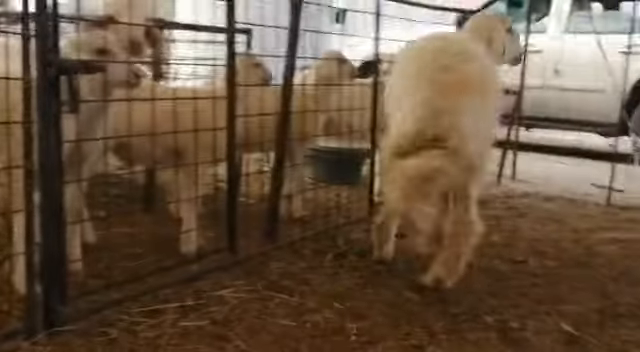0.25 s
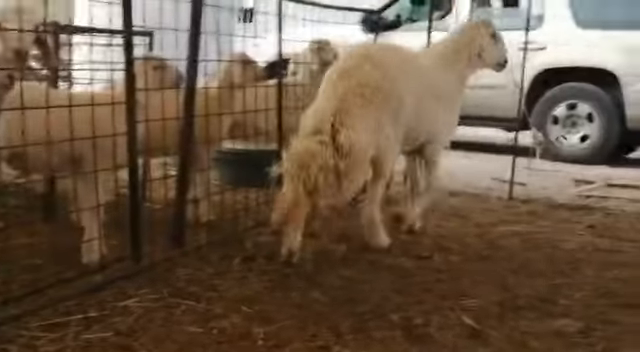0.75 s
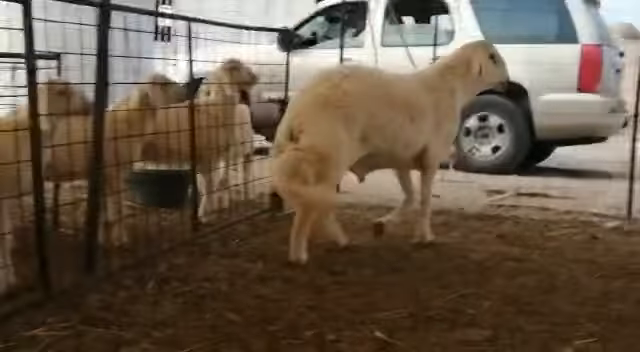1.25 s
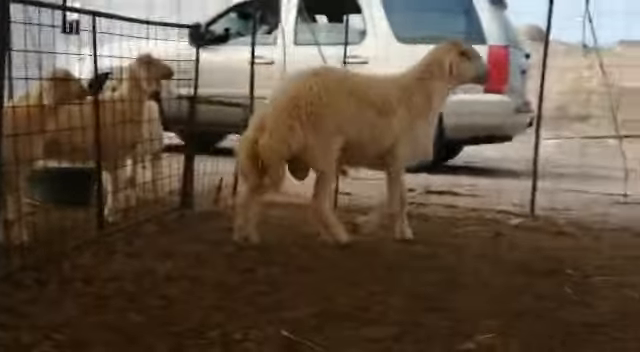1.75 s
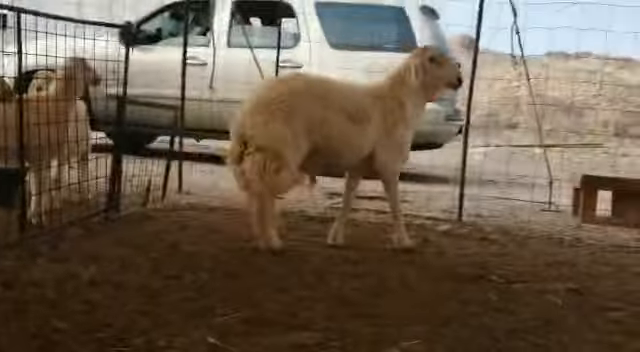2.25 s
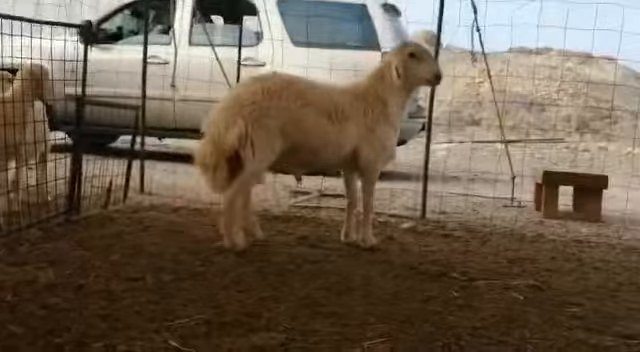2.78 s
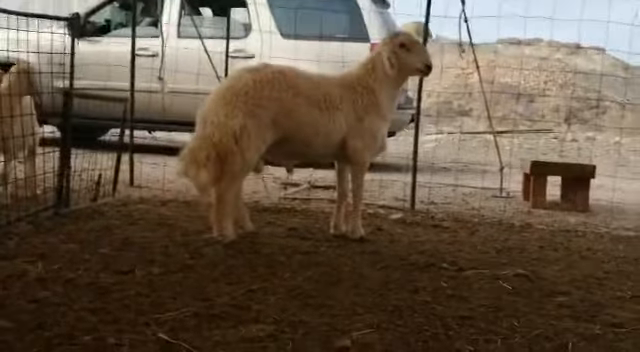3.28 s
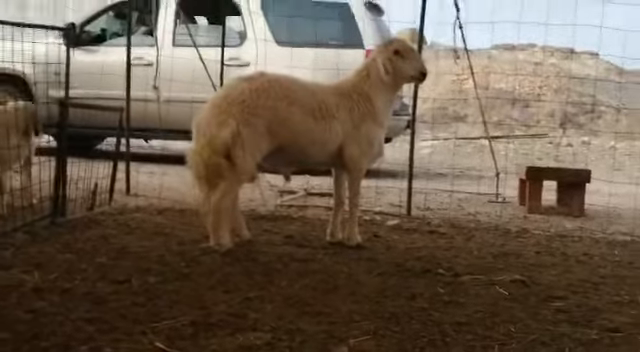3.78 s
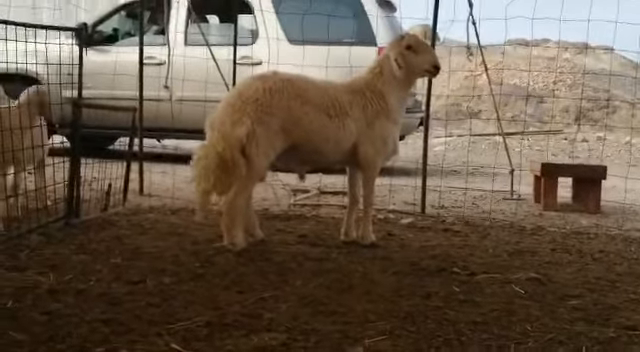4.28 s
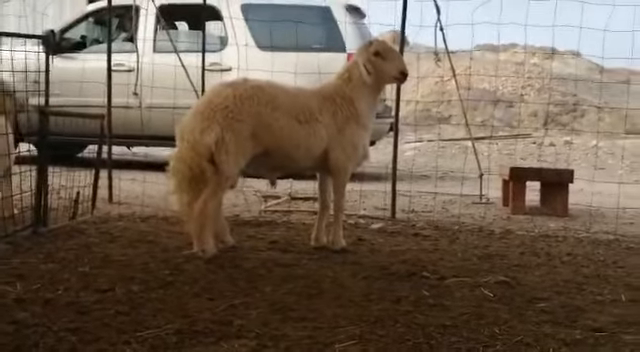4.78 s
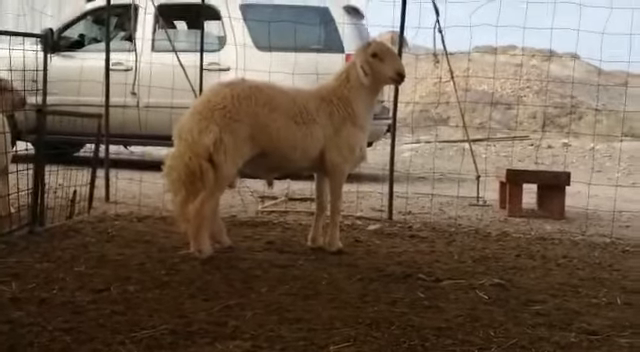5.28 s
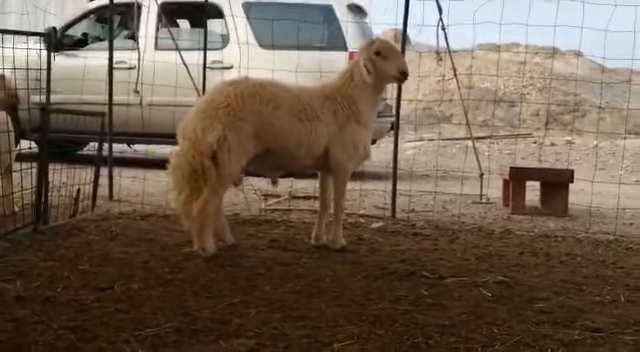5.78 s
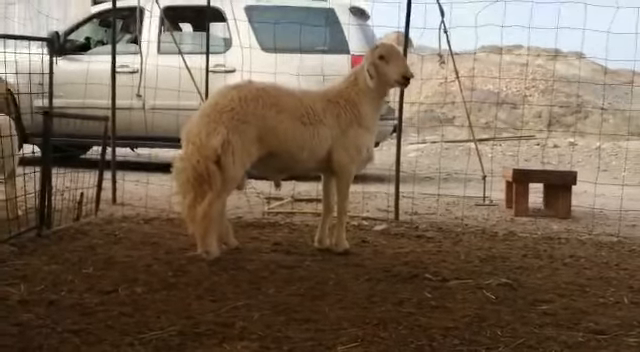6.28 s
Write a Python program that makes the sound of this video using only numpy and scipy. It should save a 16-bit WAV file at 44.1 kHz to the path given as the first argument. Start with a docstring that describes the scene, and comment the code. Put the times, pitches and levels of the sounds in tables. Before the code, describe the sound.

Heavy low wind buffets a hand-held microphone in an open dirt pen while a sheep gives two low, hoarse, quavering bleats amid straw rustles.

```python
"""In an open dirt pen, two low, quavering sheep bleats are heard through a hand-held camera's two ports.
Throat resonances ring at each snap of the vocal folds; the second bleat starts with a creak.
Wind is filtered noise that swells in gusts, with single buffets on the two microphone ports.
A treble hiss rises and falls, straw is scuffed as grainy noise, and a bird chirps in gliding sine tones.
Scrapes and one clack ring resonances, the camera housing ticks in the hand, and faint echoes answer."""
import sys
import numpy as np
from scipy import signal
from scipy.fft import rfft, irfft, next_fast_len
from scipy.io import wavfile

SR = 44100
rng = np.random.default_rng(int(sys.argv[2]) if len(sys.argv) > 2 else 0)


def digitize_waveform(pressure):
    """Quantize a signal to 16-bit integers and store it at the path in sys.argv[1].

    Rows of a 2-D input are taken as channels; values are limited to [-1, 1].
    """
    field = np.atleast_2d(pressure).T
    bounded = np.clip(field, -1, 1)
    quanta = np.round(bounded * 32767).astype(np.int16)
    wavfile.write(sys.argv[1], SR, quanta)


N = 287973
T = np.arange(N) / SR  # time of every sample, s


def gain_of(db):
    """Turns decibels into an amplitude factor."""
    return 10 ** (np.asarray(db) / 20)


def evened(x):
    """Scales a sound to an overall rms of 1."""
    return x / np.sqrt(np.mean(x ** 2) + 1e-20)


def read(points, hz):
    """Reads a spectrum whose points are joined by straight lines on a log-frequency axis."""
    point_hz, value = np.transpose(points)
    return np.interp(np.log(hz + 1), np.log(point_hz), value)


def follow(rows, t):
    """Reads each column of a curve at the times t."""
    s, *columns = np.transpose(rows)
    return [np.interp(t, s, column) for column in columns]


def shaped(x, curve):
    """Filters x by a function from Hz to dB."""
    length = x.shape[-1]
    size = next_fast_len(length)
    gain = gain_of(curve(np.fft.rfftfreq(size, 1 / SR)))
    return irfft(rfft(x, size) * gain, size)[..., :length]


def wander(size, hz):
    """Slow random drift of rms 1, with changes up to about hz."""
    return evened(shaped(rng.standard_normal(size), lambda f: -20 * np.log10(1 + (f / hz) ** 4)))


def panned(x, pan_db):
    """Shares a sound between left and right at constant power; positive leans left."""
    return x * evened(gain_of([[pan_db / 2], [-pan_db / 2]]))


def add(mix, s, sound):
    """Lays a sound into the mix at time s and trims what runs past the end."""
    part = mix[:, max(round(s * SR), 0):][:, :sound.shape[-1]]
    part += sound[..., :part.shape[1]]


def resonate(x, hz, width_hz):
    """A resonance of gain 1 at its centre, which follows the curve hz."""
    turn = np.exp(2j * np.pi * np.cumsum(hz * np.ones(len(x))) / SR)
    r = np.exp(-np.pi * width_hz / SR)
    # shift the centre down to 0 Hz, smooth there, then shift back
    return 2 * (turn * signal.lfilter([1 - r], [1, -r], x / turn + 1e-18)).real


def steadied(x, seconds):
    """Holds the short-term level of x at 1."""
    window = np.hanning(int(seconds * SR) + 3)
    weight = signal.fftconvolve(np.ones(len(x)), window, "same")
    power = signal.fftconvolve(x ** 2, window, "same") / weight
    return x / np.sqrt(abs(power) + 1e-9)


def swell(s, db, length, rise):
    """The power of one smooth rise and fall that peaks at s; rise is the share spent building up."""
    u = (T - s) / length
    side = np.where(u < 0, rise, 1 - rise)
    return gain_of(db) ** 2 * np.exp(-np.minimum((u / side) ** 2, 50))


# colour of the open air: [pitch_hz, level_db per Hz, relative]
AIR_COLOUR = [(20, 19), (70, 14.5), (140, 4.5), (250, 10), (450, 2), (900, 1), (1600, -5), (2500, -12),
              (4000, -25), (9000, -17.5)]


def open_air(level_db=-62.5):
    """Steady noise, strongest in the bass, for the open-air background."""
    return gain_of(level_db) * evened(shaped(rng.standard_normal((2, N)), lambda f: read(AIR_COLOUR, f)))


# colour of the slow heavy eddies: [pitch_hz, level_db per Hz, relative]
RUMBLE_COLOUR = [(8, -10), (25, -2), (60, 1), (100, -3), (160, -12), (240, -33), (350, -61), (600, -100),
                 (1200, -73.5)]
# colour of the small quick eddies: [pitch_hz, level_db per Hz, relative]
FLUTTER_COLOUR = [(50, -37), (130, 9), (210, 8), (320, -4), (470, -18.5), (700, -35), (1100, -57),
                  (3000, -91)]
# the breeze between gusts, before the trim and unrest: [time_s, left_level_db, right_level_db]
BREEZE_LEVELS = [(-0.0, -21, -27.5), (0.53, -33, -34), (0.89, -29.5, -35.5), (1.12, -49.5, -53),
                 (1.43, -20.5, -32), (1.8, -34.5, -43.5), (1.96, -25, -25), (2.22, -36.5, -45),
                 (2.67, -31.5, -51), (2.97, -52, -79), (3.54, -33.5, -34.5), (3.95, -64.5, -59.5),
                 (4.53, -30, -60), (4.88, -42.5, -65), (5.48, -38, -63), (5.87, -55, -53), (6.09, -44, -59),
                 (6.53, -46, -62)]
# gusts, most on one port; level is for the stronger port, before the trim:
# [peak_s, level_db, length_s, left_minus_right_db, small_against_large_eddies_db]
WIND_GUSTS = [(0.178, -23.5, 0.047, 24, -4.5), (0.227, -22, 0.027, -5, 5), (0.361, -23.5, 0.2, -2, 4),
              (0.513, -28, 0.017, -11, 3.5), (0.659, -26, 0.011, 29, 3), (0.964, -27, 0.04, 40, -3),
              (1.152, -28, 0.066, 35, -7.5), (1.425, -24.5, 0.092, 34, 3), (1.547, -30.5, 0.081, -4.5, 3.5),
              (1.638, -21.5, 0.05, 16, -6.5), (1.823, -20, 0.09, 21, -4.5), (2.022, -23.5, 0.024, -21, 5),
              (2.082, -27, 0.092, 33, -8), (2.213, -23.5, 0.072, 22, -12), (2.432, -22, 0.077, 28, -7),
              (2.52, -36, 0.036, -18, -21), (2.768, -33, 0.064, -26, -34), (2.93, -37, 0.08, -17, -27),
              (3.037, -27, 0.068, 32, -29), (3.15, -25, 0.076, 25, -6), (3.298, -33.5, 0.17, -10, -9.5),
              (3.374, -26, 0.039, 28, -4.5), (3.548, -21.5, 0.02, 30, -20), (3.704, -32, 0.024, 3, -16),
              (3.977, -33, 0.021, 14, -8), (4.102, -33.5, 0.1, 39, -31), (4.587, -29, 0.11, 17, -13),
              (4.672, -28, 0.044, -19, -15), (4.76, -29.5, 0.028, 29, -0.5), (4.877, -28, 0.19, 15.5, -16),
              (5.085, -23.5, 0.05, 16, -11), (5.245, -34, 0.15, -20, -21), (6.011, -47.5, 0.07, -14, -8),
              (6.26, -20, 0.068, 42, -12.5)]
BREEZE_EDDIES_DB = -10  # small eddies against large in a full breeze
EDDY_GROWTH = 0.3  # dB by which small eddies thin out for each dB of lull


def wind(port, full_breeze_db=-27, lumpiness=0.83, level_db=-1.0, unrest_db=1.5):
    """Slow heavy eddies and small quick ones on one port (0 left, 1 right), fed by breeze and gusts."""
    breeze_db = follow(BREEZE_LEVELS, T)[port] + unrest_db * wander(N, 8.1)
    power = gain_of(breeze_db) ** 2
    eddies_db = BREEZE_EDDIES_DB + EDDY_GROWTH * (breeze_db - full_breeze_db)
    small = power * gain_of(eddies_db) ** 2
    for s, db, length, pan_db, gust_eddies_db in WIND_GUSTS:
        port_db = min((pan_db, -pan_db)[port], 0)  # only the weaker port is turned down
        gust = swell(s, db + port_db, length, rise=0.34)
        power = power + gust
        small = small + gust * gain_of(gust_eddies_db) ** 2
    slow = evened(shaped(rng.standard_normal(N), lambda f: read(RUMBLE_COLOUR, f)))
    lumps = rng.standard_normal(N) * np.exp(lumpiness * wander(N, 29.4))
    quick = evened(shaped(lumps, lambda f: read(FLUTTER_COLOUR, f)))
    eddies = steadied(slow + quick * np.sqrt(small / power), 0.11)
    return gain_of(level_db) * np.sqrt(power) * eddies


# single buffets on a port, level before panning: [centre_s, peak_db, width_s, left_minus_right_db]
WIND_BUFFETS = [(.185, -19.5, 0.0021, 25), (0.378, -23, 0.0013, 10), (.401, -19, .0012, 23),
                (.5, -25, 0.0014, -18), (0.661, -26, 0.00069, 35), (1.149, -17.5, 0.0018, 39),
                (1.372, -23, .0011, 30), (1.471, -17, 0.002, 28), (1.648, -25, 0.00094, 18),
                (1.95, -23.5, 0.0011, -16), (2.003, -21.5, 0.00068, -32), (2.032, -21, 0.0013, -20),
                (2.088, -21, .0014, 28), (2.12, -21.5, 0.0017, 28), (3.319, -21.5, 0.0018, -31),
                (3.365, -25.5, 0.0014, 25), (4.434, -27.5, 0.0026, 24), (5.101, -24, 0.0016, 12)]


def buffets(wake_db=-10, wake_s=0.018):
    """One eddy crosses a port, a push and then a pull, amid a short flurry of eddies of like size."""
    out = np.zeros((2, N))
    t = np.arange(-SR // 20, SR // 20) / SR
    for s, db, width, pan_db in WIND_BUFFETS:
        u = t / width
        eddy = -u * np.exp((1 - u ** 2) / 2)
        flurry = evened(signal.fftconvolve(rng.standard_normal(len(t)), eddy, "same"))
        flurry *= gain_of(wake_db) * np.exp(-(t / wake_s) ** 2)
        add(out, s + t[0], panned(gain_of(db) * (eddy + flurry), pan_db))
    return out


# colour shared by the hiss and the scuffs: [pitch_hz, level_db per Hz, relative]
GRAIN_COLOUR = [(530, -1), (900, -8), (1080, -12.5), (1430, -8), (1880, -2.5), (2360, -3), (2860, -1.5),
                (3260, -0.5), (3850, -6), (5570, 7.5), (7590, -10.5), (9290, -3.5), (11800, -13.5),
                (14600, -15.5), (15500, -8)]
# how differently the two ports hear it: [pitch_hz, left_minus_right_db]
PORT_BALANCE = [(1000, -0.5), (2000, -2.5), (2800, -4), (4000, -4.5), (5500, -15.5), (7000, -1.5),
                (8500, 10), (12000, 9), (15000, -8)]


def grainy_noise(size, tilt, grain=0.19):
    """Noise of quickly varying strength, coloured for each port; tilt maps Hz to dB."""
    grains = rng.standard_normal((2, size)) * np.exp(grain * wander(size, 1400))
    sides = np.array([[0.5], [-0.5]])

    def colour(f):
        balance = read(PORT_BALANCE, f)
        # the last part keeps the pair from growing louder where the ports differ
        return read(GRAIN_COLOUR, f) + tilt(f) + sides * balance - 0.47 * abs(balance)
    return evened(shaped(grains, colour))


# steady hiss, before the lean and flicker: [time_s, level_db, left_minus_right_db]
HISS_LEVELS = [(0, -72.5, -17.5), (.55, -69, -8), (1.05, -73, -8), (1.5, -72, -9), (1.85, -62.5, -8),
               (2.15, -74.5, -5), (2.72, -66, -2.5), (3.7, -69, 0), (4.15, -70.5, 0), (4.7, -54.5, -2),
               (5.02, -70, 0.5), (5.5, -59, 7), (5.8, -59, -2), (6, -65, 0.5), (6.3, -67, 0)]
# slow swells of hiss, before the lean and flicker:
# [peak_s, level_db, length_s, fizz_against_body_db, left_minus_right_db]
HISS_SWELLS = [(0.742, -64, 0.49, -3, -6), (1.193, -63, 0.17, 1, -2.5), (1.358, -64, 0.1, 1.5, 4.5),
               (2.633, -67, 0.15, -10, 8), (2.908, -65.5, 0.082, 0.5, -16), (3.146, -73, 0.045, -1, -23),
               (3.96, -65.5, 0.11, -10, 5), (4.367, -57, 0.13, -1.5, -10), (4.509, -50.5, 0.081, -2.5, -4),
               (5.27, -61, 0.26, -6, 3.5), (5.828, -64, 0.11, 6, 0), (6.508, -56.5, 0.16, -7.5, -1.5)]


def hiss(fizz_db=-6.0, split_hz=7300, flicker_db=2.14, lean_db=6, fizz_lean_db=6):
    """A treble hiss rises and falls in two bands, some swells with more fine fizz than others."""
    steady_db, steady_pan_db = follow(HISS_LEVELS, T)
    sides = np.array([[1], [-1]])
    # body and fizz are powers, so a gain here moves each side by half its dB
    body = gain_of(steady_db) ** 2 * gain_of(sides * steady_pan_db)
    fizz = body * gain_of(fizz_db) ** 2
    for s, db, length, bright_db, pan_db in HISS_SWELLS:
        power = swell(s, db, length, rise=0.54) * gain_of(sides * pan_db)
        body = body + power
        fizz = fizz + power * gain_of(bright_db) ** 2
    low = grainy_noise(N, lambda f: -10 * np.log10(1 + (f / split_hz) ** 16))
    high = grainy_noise(N, lambda f: -10 * np.log10(1 + (split_hz / (f + 1)) ** 16))
    low = low * np.sqrt(body * gain_of(sides * lean_db))
    high = high * np.sqrt(fizz * gain_of(sides * fizz_lean_db))
    return (low + high) * gain_of(flicker_db * wander(N, 18.7))


# scuffs through the straw, level before clumps and panning: [start_s, level_db, rise_s,
# hold_s from the start, fall_by_60_db_s, tilt_db per octave, top_edge_hz, left_minus_right_db]
STRAW_SCUFFS = [(1.074, -59, 0.0083, 0.019, 0.27, 2, 10000, 3),
                (1.7, -50, .001, 0.014, 0.18, 1.5, 15500, 4),
                (1.708, -56.5, 0.0076, 0.062, 0.35, -1, 14000, 0),
                (1.948, -47.5, 0.00053, 0.023, 0.2, 13.5, 8100, -4.5),
                (2.5713, -33.5, 0.00043, 0.00064, 0.018, 14, 15500, 9),
                (2.572, -50.5, 0.0025, 0.013, 0.13, 0.5, 11000, 8),
                (3.413, -48.5, 0.015, 0.05, 0.38, 1.5, 10500, 4.5),
                (4.656, -42.5, 0.0036, 0.016, 0.2, 10.5, 9000, 10),
                (5.539, -44, 0.022, 0.053, 0.72, 2.5, 13400, 6),
                (6.118, -54, 0.0082, 0.0066, 0.38, -2.5, 11000, 9)]


def scuffs(clumps_db=0.8, clumps_hz=150):
    """A quick push through the straw, which then settles in clumps."""
    out, t = np.zeros((2, N)), np.arange(SR // 2) / SR
    for s, db, rise, hold, t60, tilt_db, top_hz, pan_db in STRAW_SCUFFS:
        stroke = np.minimum(t / rise, 1) * gain_of(db - 60 * np.maximum(t - hold, 0) / t60)

        def tilt(f):
            return tilt_db * np.log2((f + 100) / 6000) - 10 * np.log10(1 + (f / top_hz) ** 10)
        clumps = gain_of(clumps_db * wander(len(t), clumps_hz))
        add(out, s, panned(grainy_noise(len(t), tilt) * stroke * clumps, pan_db))
    return out


# short dry scrapes against the pen, level before fading and panning: [start_s, level_db, centre_hz, length_s]
PEN_SCRAPES = [(0.268, -63.5, 5000, 0.037), (1.176, -61, 4950, 0.055), (1.745, -63, 2530, 0.048),
               (1.973, -63, 2130, 0.037), (2.013, -67.5, 2190, 0.052), (2.102, -69.5, 1670, 0.098),
               (2.494, -59.5, 1610, 0.041), (2.541, -61.5, 1840, 0.037), (3.974, -65.5, 2300, 0.058),
               (6.151, -64.5, 2940, 0.024)]


def scrapes(spread=0.091, pan_db=-7, slips_hz=130, upper_ratio=1.29, upper_db=-9, fade_db=-6):
    """Uneven slips of friction ring a narrow, wavering resonance and a weaker, wider one above it."""
    out = np.zeros((2, N))
    for s, db, centre_hz, length in PEN_SCRAPES:
        size = int(length * SR)
        hz = centre_hz * (1 + 0.05 * wander(size, 35))
        turns = np.cumsum(slips_hz * np.exp(0.34 * wander(size, 100))) / SR
        grit = rng.standard_normal(size) * np.exp(-(turns % 1) / 0.25)  # a burst at each slip
        lower = resonate(resonate(grit, hz, spread * centre_hz), hz, centre_hz / 2)
        upper_hz, upper_width = upper_ratio * hz, 3 * spread * centre_hz
        upper = resonate(resonate(grit, upper_hz, upper_width), upper_hz, upper_width)
        ring = evened(evened(lower) + gain_of(upper_db) * evened(upper))
        fade = gain_of(db + fade_db * np.linspace(-0.5, 0.5, size))
        add(out, s, panned(ring * signal.windows.tukey(size, 0.3) * fade, pan_db))
    return out


# ticks of the camera housing, level before panning:
# [time_s, peak_db, left_minus_right_db, share_that_rattles_on, dull_body_db]
HOUSING_TICKS = [(.147, -46, -18, 0.097, -5), (0.2123, -40.5, -19, 0.23, -14),
                 (0.355, -31.5, -26, 0.03, -6), (.401, -43, -20, .05, -12), (0.4743, -45, -22, 0.33, -32),
                 (0.612, -39.5, -22, 0.33, -19), (0.654, -41.5, -22, 0.57, -17),
                 (1.507, -29, -36, 0.058, 1.5), (1.537, -34.5, -28, 0.05, 6),
                 (1.5704, -28.5, -30, 0.035, 6), (1.5813, -39, -24, 0.18, -10), (1.611, -39, -30, 0.17, -2),
                 (1.631, -35.5, -24, 0.05, 7), (1.6482, -42, -24, 0.078, 2), (6.224, -51, 5.0, 0.091, 1)]
# colour of the housing: [pitch_hz, level_db per Hz, relative]
HOUSING_COLOUR = [(300, 5.5), (800, -2.5), (1600, -11), (2800, -14), (4000, -20.5), (5500, 0),
                  (6500, -16.5), (8000, -28), (15000, -34)]


def ticks(rattle_t60=0.19, body_hz=2480):
    """Snaps of the housing as short noise bursts, each with a weaker rattle dying away behind it."""
    out, lead = np.zeros((2, N)), 0.005  # s of room before the blow
    t = np.arange(SR // 8) / SR - lead
    for s, db, pan_db, rattle, body_db in HOUSING_TICKS:
        snap = np.exp(-abs(t - 0.001) / 0.0005)
        blow = snap + (t > 0) * rattle * gain_of(-60 * abs(t) / rattle_t60)

        def colour(f):  # the dull body lies below body_hz
            return read(HOUSING_COLOUR, f) + body_db / (1 + (f / body_hz) ** 4)
        tick = shaped(blow * rng.standard_normal(len(t)), colour)
        add(out, s - lead, panned(tick / abs(tick).max() * gain_of(db), pan_db))
    return out


# resonances of the clack, relative to its level: [pitch_hz, level_db, fall_by_60_db_s]
CLACK_RINGS = [(2100, -16.5, 0.02), (3410, 6.5, 0.0074), (4240, -5, 0.0093), (5540, -12, 0.0096)]


def clack(start_s=4.1995, level_db=-28.5):
    """One hard knock rings a few well-damped resonances."""
    out, t = np.zeros((2, N)), np.arange(SR // 10) / SR
    ring = sum(gain_of(db - 60 * t / t60) * np.sin(2 * np.pi * hz * t) for hz, db, t60 in CLACK_RINGS)
    add(out, start_s, gain_of(level_db) * ring * np.minimum(t / 0.0019, 1))
    return out


# bird chirps, level before fading and panning: [start_s, length_s, top_pitch_hz,
# share_of_pitch_climbed (negative starts above), share_of_pitch_lost_by_the_end, raggedness 0-1,
# share_of_second_voice, level_db, left_minus_right_db]
BIRD_CHIRPS = [(0.237, 0.032, 5320, .06, 0.097, 0.4, 0.59, -54.5, -24),
               (0.484, 0.054, 4680, -.05, 0.19, 0.2, .45, -54, -25),
               (0.529, .02, 4750, 0.11, .02, .3, .4, -58, -20),
               (0.551, 0.018, 3370, .02, .02, .6, .3, -63.5, -13),
               (0.564, 0.035, 4080, .06, .19, .7, 0.53, -61, -13),
               (1.128, 0.048, 4530, .03, 0.026, 0.15, .1, -57.5, -14),
               (4.245, 0.059, 4700, .1, 0.24, 0.15, .6, -58, 13),
               (4.319, 0.046, 3840, 0.157, 0.1, .8, 0.74, -61.5, 8),
               (4.475, 0.042, 4450, 0.036, 0.18, 0.12, .1, -53.5, 6),
               (4.51, 0.016, 3730, 0.036, 0.02, 0.3, .2, -57, 11),
               (4.532, 0.03, 3480, 0.076, 0.043, 0.15, .1, -54.5, 20)]


def bird(buzz_hz=450, crest=0.46, warble=0.045, second_ratio=0.915):
    """Short two-voiced whistles glide to a bend and fall; the more ragged, the more they warble and buzz."""
    out = np.zeros((2, N))
    for s, length, top_hz, climb, fall, ragged, second, db, pan_db in BIRD_CHIRPS:
        u = np.arange(0, length, 1 / SR) / length
        size = len(u)
        before = np.maximum(1 - u / crest, 0)  # crest is the share of the chirp before the bend
        after = np.maximum(u - crest, 0) / (1 - crest)
        hz = top_hz * (1 - climb * before ** 2 - fall * np.sin(np.pi / 2 * after) ** 2)
        turns = np.cumsum(hz * (1 + warble * ragged * wander(size, 400))) / SR
        voices = np.sin(2 * np.pi * turns) + second * np.sin(2 * np.pi * second_ratio * turns)
        whistle = evened(voices * (1 + ragged * wander(size, buzz_hz)))
        add(out, s, panned(whistle * signal.windows.tukey(size, 0.4) * gain_of(db), pan_db))
    return out


# jerks of the larynx that make the voice quaver or catch:
# [centre_s, length_s, lowest_resonance_change_db, upper_resonances_change_db]
LARYNX_JERKS = [(3.512, 0.04, -4.5, 9), (3.534, .018, 1.5, 10), (3.601, .026, -8, 19),
                (3.688, 0.023, -4, 19), (3.717, .012, -5, -2), (3.731, .024, 2, 13),
                (3.765, 0.028, -4.5, 13.5), (3.82, 0.017, -4, 1), (3.847, 0.032, -2, 13),
                (3.874, 0.018, 4, 0), (3.903, 0.014, -4, 4), (3.938, 0.039, -1, 9.5), (4.048, 0.037, 2, 12),
                (4.45, 0.038, -2, -25), (4.502, 0.05, -0.5, 4.5), (4.542, 0.019, -5.5, -12),
                (4.772, 0.015, -4, -1), (4.893, 0.027, -6, 0), (4.97, .018, -11, -1),
                (5.466, 0.016, 0, -18), (5.48, .015, 0, 7)]


def quaver(t, sweep=0.087):
    """Larynx jerks: dB on the lowest resonance, dB on the upper ones, and the upper ones' glide."""
    s, length, low_db, upper_db = np.transpose(LARYNX_JERKS)
    u = 2 * (t[:, None] - s) / length
    jerk = np.exp(-u ** 2 * np.log(2))
    # only jerks that strengthen the upper resonances make them glide
    share = (upper_db / abs(upper_db).max()).clip(0)
    return jerk @ low_db, jerk @ upper_db, 1 + sweep * (u * jerk) @ share


# hoarseness of the voice: [time_s, roughness 0-1]
HOARSENESS = [(3.43, 0.38), (3.8, 0.42), (4.08, 0.65), (4.39, 0.55), (4.5, 0.6), (4.6, .38), (4.72, 0.28),
              (4.87, 0.36), (5, 0.25), (5.12, .14), (5.27, 0.17), (5.37, 0.36), (5.45, 0.6), (5.48, .85)]
# opening of the mouth, which tunes the resonances: [time_s, pitch_factor]
MOUTH_OPENING = [(3.45, 0.78), (3.52, 0.94), (3.74, 1), (4.08, 1.025), (4.37, 0.87), (4.42, 1), (4.8, 1),
                 (4.95, 0.88), (5.12, 0.885), (5.33, 0.895), (5.4, .965), (5.45, 1.07), (5.48, .89)]
# extra level of the third resonance, which fades and returns: [time_s, level_db]
THIRD_RESONANCE = [(4.37, 0), (4.41, 3.5), (4.58, -2), (4.83, -15), (5.1, -4.5), (5.3, 2), (5.46, 2.5)]
# effort through both bleats: [time_s, level_db]
VOICE_EFFORT = [(3.43, -11), (3.47, -2), (3.56, 1.5), (3.72, 0), (3.88, 1.5), (3.92, -0.5), (4.02, -5.5),
                (4.075, -15), (4.37, -24), (4.41, -10.5), (4.5, 0.5), (4.62, 0), (4.73, -3.5), (4.98, -3.5),
                (5.17, -13), (5.38, -15.5), (5.44, -25), (5.5, -26)]
WEAK_PULSE, PUFF_SHARE = 0.35, 0.25  # weakening of every other snap; share of a cycle a puff takes to fade
QUAVER_SAG = 0.0075  # share by which the lowest resonance sinks for each dB that a jerk chokes it
RASP_ABOVE, RASP_WIDTH_HZ = 1.2, 680  # the rasp's centre against the top resonance, and its width
RASP_GROWTH = 1.5  # power by which rasp grows with hoarseness


def bleat(melody, throat, level_db, chest_db, rasp_db, jitter, puff,
          shimmer=0.34, tremor=0.0067, flutter_db=2.0):
    """Snaps of the vocal folds, each with a short puff of air, ring the moving throat resonances."""
    t = np.arange(melody[0][0], melody[-1][0], 1 / SR)
    size = len(t)
    curves = (melody, MOUTH_OPENING, THIRD_RESONANCE, VOICE_EFFORT)
    (pitch,), (mouth,), (third_db,), (effort_db,) = (follow(curve, t) for curve in curves)
    low_db, upper_db, glide = quaver(t)
    rough = np.clip(follow(HOARSENESS, t)[0], 0, 1)
    unsteady = jitter * wander(size, 69.3) + tremor * wander(size, 16.45)
    turns = np.cumsum(pitch * (1 + rough * unsteady)) / SR
    # many equal harmonics in step make one snap a cycle
    folds = evened(sum(np.cos(2 * np.pi * k * turns) for k in np.arange(1, 35)))
    folds *= 1 + WEAK_PULSE * rough * np.cos(np.pi * turns)  # when hoarse, strong and weak snaps alternate
    uneven = shimmer * rough * wander(size, 38)
    air = evened(np.exp(-(turns % 1) / PUFF_SHARE) * rng.standard_normal(size))
    voice = np.zeros(size)
    for k, (centre_hz, width, trim_db, by_effort, by_mouth) in enumerate(throat):
        hz = centre_hz * mouth ** by_mouth * (glide if k else 1 + QUAVER_SAG * low_db)
        db = trim_db + by_effort * effort_db + (upper_db if k else low_db) + third_db * (k == 2)
        # the higher the resonance, the more it feels uneven closure and rushing air
        drive = folds * np.exp((k + 1) / 2 * uneven) + (1 + k) * puff * rough * air
        ring = resonate(resonate(resonate(drive, hz, width), hz, 2 * width), hz, 5 * width)
        voice += steadied(ring, 0.045) * gain_of(db)
    # hz, drive and db now belong to the top resonance; a wide rasp sits above it, steeper with hoarseness
    rasp_hz = RASP_ABOVE * hz
    rasp = resonate(resonate(drive, rasp_hz, RASP_WIDTH_HZ), rasp_hz, RASP_WIDTH_HZ)
    rasp = steadied(rasp, 0.035) * rough ** RASP_GROWTH * gain_of(db + rasp_db)
    # the chest passes a little of the lowest harmonics
    chest = evened(resonate(resonate(folds, 176, 65), 219.0, 72)) * gain_of(effort_db + chest_db)
    flutter = flutter_db * rough * wander(size, 35)
    return gain_of(level_db + flutter) * (voice + rasp + chest) * signal.windows.tukey(size, 0.035)


# pitch of the low bleat, before its unsteadiness: [time_s, pitch_hz]
LOW_MELODY = [(3.431, 84.6), (3.456, 89.2), (3.5, 85.2), (3.556, 88.7), (3.599, 85.33), (3.696, 93.3),
              (3.745, 87.93), (3.889, 86.1), (4.074, 83.2)]
# pitch of the long bleat, which starts in a creak and breaks upward half-way: [time_s, pitch_hz]
LONG_MELODY = [(4.365, 86.2), (4.42, 87.94), (4.485, 111), (4.505, 111), (4.528, 97), (4.562, 110),
               (4.608, 112.7), (4.64, 109.7), (4.712, 110), (4.772, 107.4), (4.828, 109.7), (4.882, 127.9),
               (4.93, 130.6), (5.1, 127.9), (5.281, 124.7), (5.4, 116), (5.45, 98), (5.505, 125.4)]
# throat resonances of the low bleat, before mouth and effort move them:
# [centre_hz, narrowest_width_hz, level_db, share_of_effort, share_of_mouth_movement]
LOW_RESONANCES = [(540, 54, 0.8, 1, 0.79), (1425, 190, -19, .6, .05)]
# throat resonances of the long bleat, same columns:
# [centre_hz, narrowest_width_hz, level_db, share_of_effort, share_of_mouth_movement]
LONG_RESONANCES = [(530, 84, 0.3, 1.06, 0.3), (1412, 112, -5, 0.45, 0.54), (2125, 118, -7.3, 0.3, 0.87)]


def sheep(pan_db=-10.0):
    """Both bleats come from the right and reach the left port a little later."""
    out = np.zeros((2, N))
    low = bleat(LOW_MELODY, LOW_RESONANCES, level_db=-48.5, chest_db=-7, rasp_db=-7,
                jitter=0.055, shimmer=0.6, puff=2.2)
    add(out, LOW_MELODY[0][0], low)
    long = bleat(LONG_MELODY, LONG_RESONANCES, level_db=-46.5, chest_db=-19, rasp_db=4.5,
                 jitter=0.025, puff=1.0, tremor=0.026)
    add(out, LONG_MELODY[0][0], long)
    out[0] = np.roll(out[0], 19)  # samples
    return panned(out, pan_db)


def sparse_taps(size):
    """Random single reflections, about 2000 a second on each side."""
    return rng.standard_normal((2, size)) * (rng.random((2, size)) < 2000 / SR)


def pen(x, t60=0.34):
    """Short, quickly fading reflections from roof, ground and fence."""
    t = np.arange(SR // 3) / SR
    taps = sparse_taps(len(t)) * (t > 0.004) * gain_of(-60 * t / t60)
    return signal.fftconvolve(x, taps / np.linalg.norm(taps[0]), axes=1)[:, :N]


def yard(x, delay_s=0.06, t60=1.0, dull_hz=2000):
    """A dull echo from the buildings and hillside around the pen, which builds up over delay_s."""
    t = np.arange(SR) / SR
    taps = sparse_taps(SR) * np.minimum(t / delay_s, 1) ** 2 * gain_of(-60 * t / t60)
    tail = shaped(taps / np.linalg.norm(taps[0]), lambda f: -10 * np.log10(1 + (f / dull_hz) ** 2))
    return signal.fftconvolve(x.mean(0)[None], tail, axes=1)[:, :N]


def scene():
    """Sheep, bird, scuffs and knocks in the pen, under hiss and the wind on the two ports."""
    gusts = np.array([wind(port) for port in range(2)])
    near = scrapes() + clack() + bird() + sheep()
    echoes = gain_of(-15) * pen(near) + gain_of(-13) * yard(near)
    return open_air() + gusts + buffets() + hiss() + scuffs() + ticks() + near + echoes


def record(dry, edge_hz=15500):
    """A soft start, then the recorder's upper band limit."""
    started = dry * np.minimum(T / 0.01, 1)
    band_limit = signal.firwin(255, edge_hz, window=("kaiser", 9), fs=SR)
    return signal.oaconvolve(started, band_limit[None], "same")


dry = scene()
out = record(dry)
digitize_waveform(out)
```